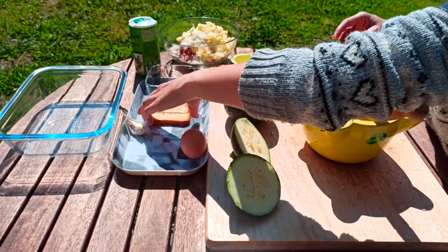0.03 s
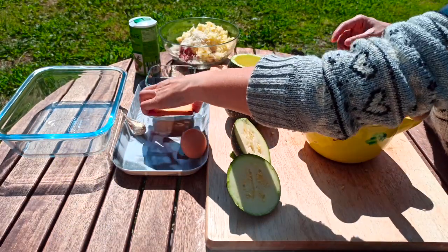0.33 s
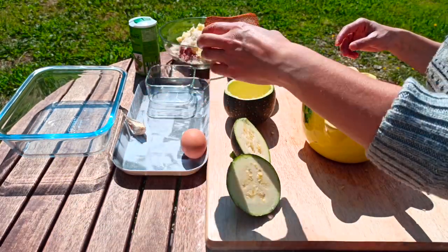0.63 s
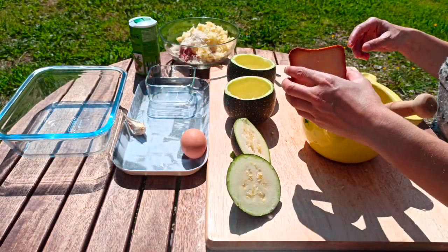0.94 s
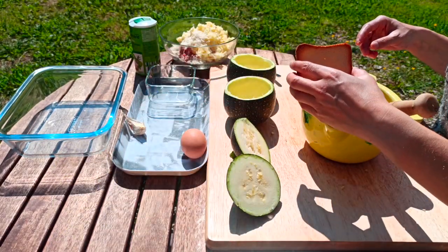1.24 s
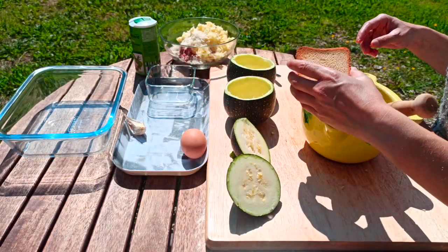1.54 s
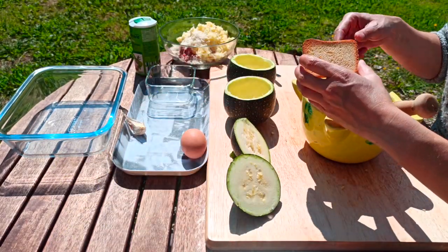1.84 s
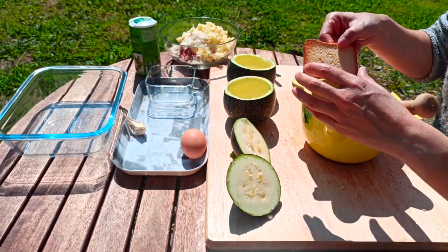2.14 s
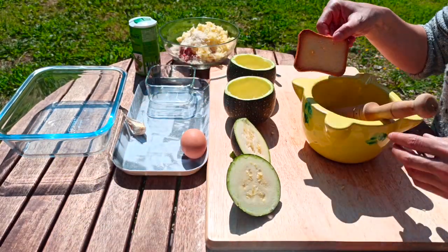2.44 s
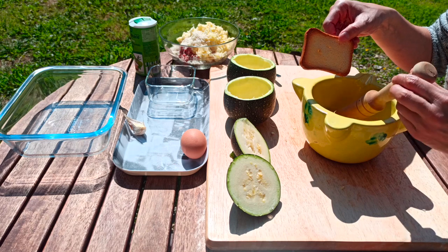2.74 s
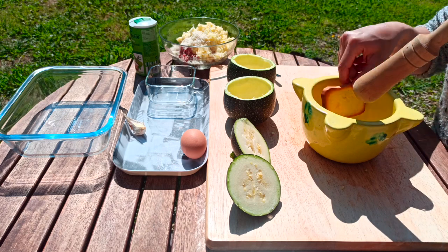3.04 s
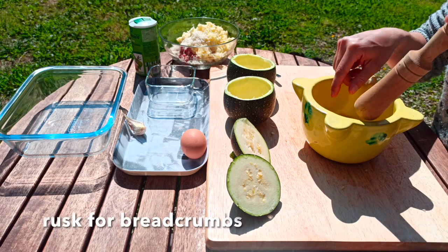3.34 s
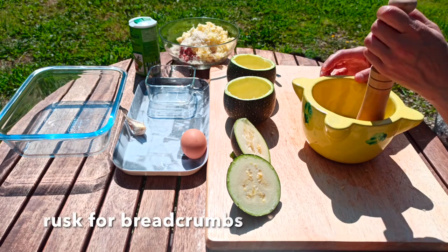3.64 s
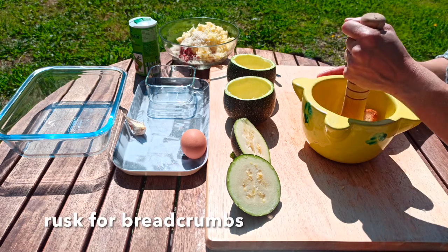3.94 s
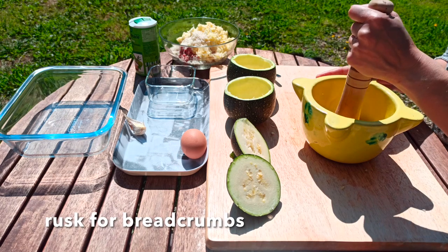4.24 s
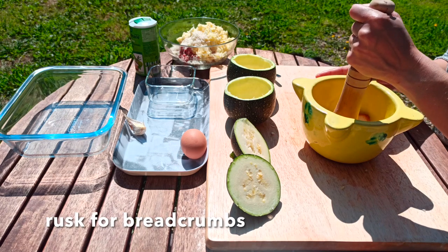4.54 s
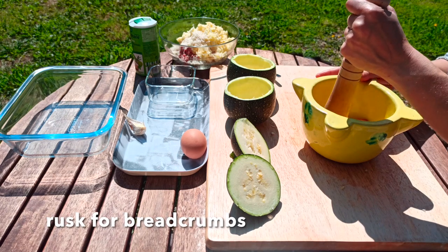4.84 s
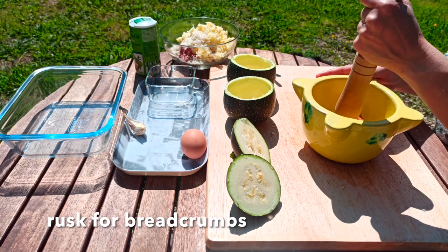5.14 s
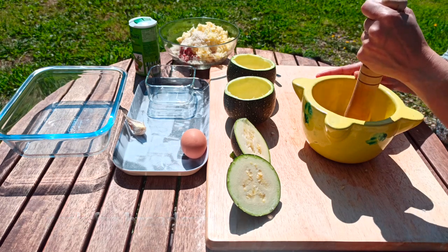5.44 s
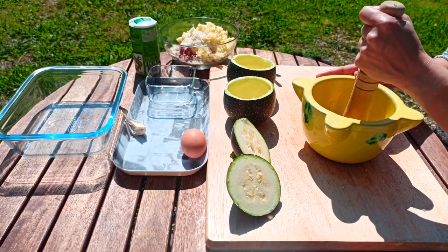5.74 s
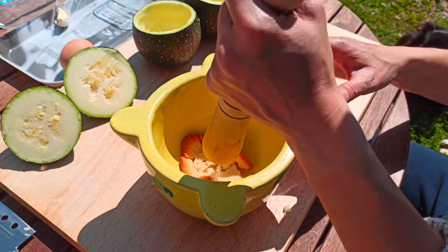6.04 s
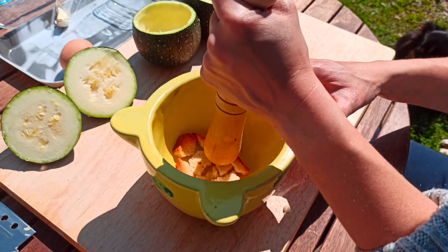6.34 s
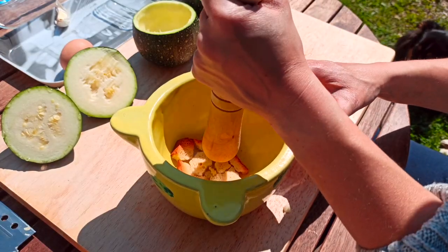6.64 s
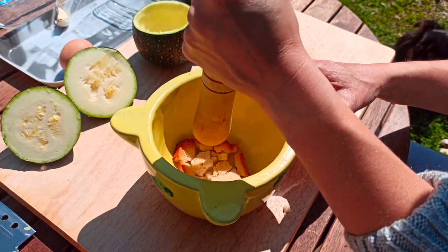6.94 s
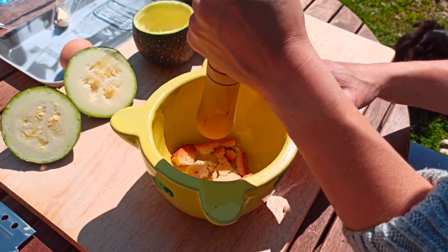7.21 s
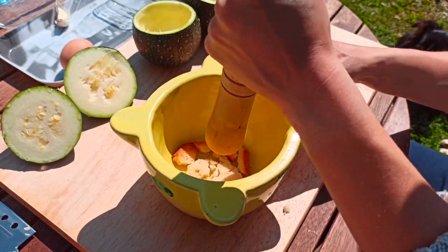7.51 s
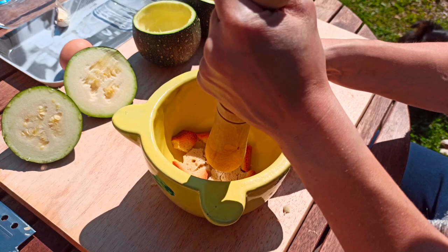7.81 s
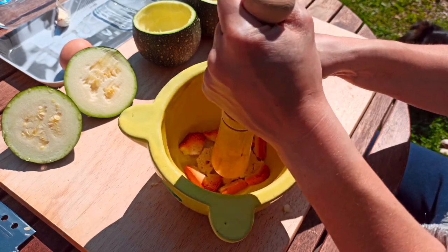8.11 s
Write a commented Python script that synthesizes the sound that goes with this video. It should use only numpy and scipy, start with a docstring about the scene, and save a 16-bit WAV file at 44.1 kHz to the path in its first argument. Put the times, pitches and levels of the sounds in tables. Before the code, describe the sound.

A wooden pestle pounds a brittle rusk in a ceramic mortar on an outdoor table, heard from close by. First come a soft knock, distant chirping birds and a faint brush of a sleeve, then a few snaps and hollow clinks. The pestle then settles into an even rhythm of sharp crunches and wooden thuds, with soft puffs of wind on the microphone in the later part.

```python
"""Pounding a rusk in the garden

A rusk is lifted off a tray, dropped in a ceramic mortar and pounded with a wooden pestle. Each blow is a
burst of tiny fractures over the thud of mortar, board and table. Songbirds and an insect sit far back.
We listen from a phone: first facing the table, then close over the mortar, where a breeze hits its ports."""
import sys
import numpy as np
from scipy import signal
from scipy.fft import rfft, irfft
from scipy.io import wavfile
from scipy.ndimage import uniform_filter1d

SR = 44100
rng = np.random.default_rng(int(sys.argv[2]) if len(sys.argv) > 2 else 0)


def transcribe(signal):
    """Save signal, clipped to [-1, 1], as a 16-bit WAV file at the path in sys.argv[1]."""
    frames = np.atleast_2d(signal).T
    limited = np.clip(frames, -1, 1)
    pcm = np.round(limited * 32767).astype(np.int16)
    wavfile.write(sys.argv[1], SR, pcm)


N = 364707
TIME = np.arange(N) / SR
MOVE_S = 5.98  # the perspective cuts from front to overhead

# tone of the garden bed: (frequency [Hz], gain [dB])
GARDEN_EQ = [(15, -59), (25, -24), (120, -1), (315, -7), (453, -7.5), (523, -9), (751, -13.5),
             (1550, -21.5), (1790, -21), (3280, -24), (4270, -22.5), (7260, -24), (8000, -25),
             (10400, -58.5), (17600, -120)]
# runs of down-slurred bird notes: (start [s], end [s], spacing [s], note length [s],
# first pitch [Hz], last pitch [Hz], fall per note [octaves], level [dB])
BIRD_RUNS = [(0.027, .75, .125, 0.083, 3530, 3440, 0.23, -66.5),
             (2.439, 2.87, 0.1, .055, 3454, 3306, 0.57, -56.5),
             (2.53, 2.75, 0.074, 0.0276, 5510, 5460, 0.075, -60.5),
             (6.001, 6.75, 0.15, 0.089, 4010, 2507, .2, -62.5),
             (6.92, 7.28, 0.13, 0.0904, 3530, 2800, 0.12, -66.5)]
# a warbler's syllable: (time into it [s], pitch [Hz], gain [dB])
WARBLER_SYLLABLE = [(0, 4480, -19), (0.041, 5300, -29), (.05, 6600, -2.5), (0.064, 6570, -22),
                    (0.081, 4570, 5), (0.108, 4250, -11), (.113, 3850, 5.5), (0.132, 4120, -16),
                    (.147, 3950, -23)]
# lone arched bird notes: (time [s], length [s], middle pitch [Hz], fall [octaves], level [dB])
BIRD_NOTES = [(0.294, 0.056, 3680, 0.8, -58), (2.939, 0.048, 2906, -0.53, -55),
              (3.069, 0.062, 3800, 0.48, -54), (3.152, 0.046, 3113, -.15, -54.5),
              (3.368, 0.067, 2976, .6, -57), (3.518, 0.1, 3150, .4, -57.5),
              (7.711, 0.063, 3840, .25, -53.5), (7.855, .036, 3690, .3, -55.5),
              (8.013, 0.046, 2660, -0.55, -59.5), (8.225, 0.037, 2870, 0.5, -62)]
# thin insect trills: (time [s], length [s], pitch [Hz], level [dB])
INSECT_TRILLS = [(0.628, 0.17, 7260, -73), (7.336, .28, 7430, -74)]
# light knocks on tray, board and mortar: (time [s], peak [dB], low-pass [Hz], table share [dB])
KNOCKS = [(.166, -39.5, 695, -11), (0.184, -41.5, 900, 5), (0.223, -28, 870, -8.5), (.271, -43.5, 1400, 2),
          (3.142, -39.5, 1170, 0.5), (3.227, -34, 1600, -5), (3.299, -31, 1200, 6), (3.312, -23, 1490, -4),
          (5.985, -40.5, 600, 11.5), (8.197, -32, 550, 15.5), (8.233, -34, 700, 1)]
# modes of the mortar on its board: (base frequency [Hz], level [dB], base t60 [s])
BOARD_MODES = [(336, 0, 0.095), (467, -11, 0.046), (602, -9.5, 0.14), (803, -3, 0.076), (959, -0.5, 0.057),
               (1410, -5.5, 0.039), (1710, -16.5, .06), (1750, -0.5, .06)]
# modes of the table beneath: (base frequency [Hz], level [dB], t60 [s])
TABLE_MODES = [(122.6, -14.5, 0.14), (161.5, -11, 0.086), (227.7, -5.5, 0.042)]
# tone of the chattering table slats: (frequency [Hz], gain [dB])
SLAT_EQ = [(60, -20.5), (150, 0.5), (220, -2), (310, 4), (430, -1.5), (650, -8), (1000, -5.5),
           (1500, -12.5), (5000, -32.5)]
# pieces of rusk snapping alone: (time [s], level [dB], treble tilt [dB/octave])
SNAPS = [(0.2244, -34, 0), (3.141, -34.5, 0.5), (3.229, -47.5, -1), (3.3011, -24.5, -2),
         (3.36, -29.5, -2.5), (3.946, -36.5, 0), (4.012, -45.5, -8.5), (4.047, -38.5, 0), (4.0627, -28, -1),
         (5.143, -46, -0.5), (5.333, -38.5, -2), (5.357, -43, 2.5), (5.6556, -43, 7.5), (6.144, -42, 0),
         (7.197, -37.5, 6), (7.630, -22, 1), (8.251, -43, 3)]
# the pestle cracks the rusk, breaks through and lands: (time [s], crack [dB], rise [ms], decay [ms],
# thud [dB], thud low-pass [Hz], landing delay [ms], landing crack [dB], landing thud [dB])
BLOWS = [(3.9046, -15.5, 0.98, 6.3, -21.5, 2200, 6.7, -35, -47),
         (4.160, -20.5, 1.84, 4.6, -27, 600, 14, -49.5, -39.5),
         (4.4338, -24.5, 1.23, 0.81, -22.5, 280, 7.7, -34, -27.5),
         (4.7036, -20.5, 1.43, 2.3, -30, 540, 11.4, -24, -36.5),
         (4.968, -17, 1.6, 1.5, -29, 1000, 9.2, -21.5, -23.5),
         (5.268, -21.5, 2.37, 1.4, -36.5, 1500, 15, -34, -48),
         (5.523, -25.5, 1.03, 9.8, -37.5, 352, 29.3, -28.5, -45.5),
         (6.3329, -15, 0.67, 1.3, -29.5, 1100, 7.3, -13, -27.5),
         (6.575, -16.5, 1.6, 3.2, -17.5, 348, 6, -31, -36.5),
         (6.813, -14, 0.97, 3.5, -22, 747, 30.3, -52, -27),
         (7.072, -15.5, 1.6, 3.6, -21, 325, 12, -17, -27.5),
         (7.3545, -18.5, 1.4, 1.4, -20.5, 420, 24, -56.5, -32),
         (7.643, -16.5, 1.08, 1.1, -26.5, 602, 7.9, -16.5, -32),
         (7.905, -17, 0.98, 0.75, -26, 390, 8, -36, -43),
         (8.155, -17, 1.6, 1.8, -28.5, 1100, 7.2, -17, -32)]
# a blow from each perspective: (tilt [dB/octave], pitch [x], table share [dB], ring time [x], chatter [s])
FRONT_BLOW = (0, .98, 2, 0.63, .033)
ABOVE_BLOW = (1.6, .91, 0, 1.07, .065)
# bowl resonances: (frequency [Hz], width [Hz], level against the direct crunch [dB])
BOWL_RESONANCES = [(3810, 58, -18.5), (6580, 230, -5.5), (7500, 990, -3.5)]
# tone of the crunch leaving the bowl, front and overhead: (frequency [Hz], gain [dB])
FRONT_CRUNCH_EQ = [(50, -41.5), (200, -16), (820, -11), (1250, -16), (1750, -2), (2400, -5.5), (3200, -2.5),
                   (4400, 0.5), (5400, -11), (6500, -1), (7600, -1.5), (8400, -8), (12000, -18.5),
                   (15500, -22.5)]
ABOVE_CRUNCH_EQ = [(50, -50), (400, 0), (850, -10), (1400, -12), (1800, -4.5), (2300, -11.5), (3000, -4),
                   (4100, -1.5), (5400, -8), (6600, 0), (7700, -7), (8400, -12), (12000, -16),
                   (15500, -20.5)]
# a knitted sleeve brushes past: (time [s], half length [s], level [dB])
BRUSHES = [(2.588, 0.021, -52), (2.663, 0.026, -51), (2.766, 0.024, -50.5)]
# tone of the wool: (frequency [Hz], gain [dB])
SLEEVE_EQ = [(400, -22), (1100, 1.5), (2500, 10), (4500, 4.5), (7500, 2.5), (9000, -15), (15000, -36)]
# the pestle touches the bare wall: (time [s], peak [dB])
CLINKS = [(3.312, -31), (3.5168, -23.5), (3.5737, -30.5)]
# modes of the ceramic wall: (frequency [Hz], level [dB], t60 [s])
WALL_MODES = [(358, -26.5, 0.097), (610, -18, 0.047), (828, -18, 0.038), (1383, -0.5, 0.085),
              (1760, -10.5, 0.098), (1774, -9, 0.044), (2820, -38, 0.041)]
# fader ride of the breeze: (time [s], level [dB])
BREEZE_RIDE = [(5.98, -68), (6.0, -54), (6.64, -45.5), (6.74, -63), (6.81, -46.5), (6.99, -61.5),
               (7.08, -51), (7.16, -65), (7.41, -43.5), (7.43, -58), (8.1, -56.5), (8.27, -46.5)]
# single puffs thump the ports: (time [s], level [dB])
PUFFS = [(6.026, -37.5), (6.3, -45), (6.469, -34), (6.505, -43.5), (6.643, -45), (6.755, -36),
         (7.307, -41.5)]
# tone of wind on the ports: (frequency [Hz], gain [dB])
BUFFET_EQ = [(25, -7), (50, -63), (70, 7), (115, 7), (190, -6), (300, -27), (600, -31), (1500, -52),
             (5000, -104)]
# stereo balance, front and overhead: (frequency [Hz], left minus right [dB])
FRONT_PAN = [(400, -1.5), (3000, -1), (5500, -1.5), (6400, 5), (7700, 3), (8600, -9), (12000, -7),
             (13200, -7), (15500, -8)]
ABOVE_PAN = [(400, -0.5), (1500, 2), (2500, 5), (4300, 8.5), (5800, 3.5), (6800, 4), (7750, 11.5),
             (8300, -13), (12000, 0.5), (15500, 5)]
# the phone's deeply scooped treble: (frequency [Hz], gain [dB])
PHONE_EQ = [(8400, 2.5), (8800, -10), (9900, -18), (11200, -16.5), (11700, 7), (15600, 9), (16200, -32.5)]


def undb(db):
    """Decibels to gain."""
    return 10 ** (np.asarray(db) / 20)


def unit(x):
    """Scale to rms 1."""
    return x / np.sqrt(np.mean(x ** 2))


def add(track, s, sound):
    """Mix a sound into a track from time s on."""
    i = max(int(s * SR), 0)
    part = sound[:max(N - i, 0)]
    track[i:i + len(part)] += part


def butter(x, hz, kind, order=2):
    """Plain low- or high-pass."""
    return signal.sosfilt(signal.butter(order, hz, kind, fs=SR, output="sos"), x)


def colour(x, points, size=8192):
    """Minimum-phase EQ through (frequency [Hz], gain [dB]) points."""
    hz, db = np.transpose(points)
    bins_hz = np.maximum(np.arange(size // 2 + 1) * SR / size, 1)
    cepstrum = irfft(np.log(undb(np.interp(np.log(bins_hz), np.log(hz), db))))
    cepstrum[1:size // 2] *= 2
    cepstrum[size // 2 + 1:] = 0
    return signal.fftconvolve(x, irfft(np.exp(rfft(cepstrum))))[:N]


def shaped(x, points):
    """EQ a white sound without changing its power."""
    return colour(x, points) / np.linalg.norm(colour(np.ones(1), points))


def drift(rate_hz):
    """Smooth random modulation, rms 1."""
    hold = int(SR / rate_hz)
    steps = np.repeat(rng.standard_normal(N // hold + 1), hold)
    return unit(uniform_filter1d(steps, hold)[:N])


def reverb(x, t60):
    """Diffuse reflections that die away in t60 seconds."""
    t = TIME[:SR]
    tail = rng.standard_normal(SR) * undb(-60 * t / t60) * (1 - np.exp(-t / .004))
    return signal.fftconvolve(x, tail / np.linalg.norm(tail))[:N]


def garden_bed(hush_db=-66, hiss_db=-76):
    """A wide, gently breathing outdoor hush, with separate hiss at each port."""
    level = undb(hush_db + .7 * drift(3))
    mid, side = (shaped(rng.standard_normal(N), GARDEN_EQ) * level for _ in range(2))
    side = colour(side, [(60, 0.5), (200, -5.5), (600, -1), (1500, 0.5)])
    hiss = undb(hiss_db) * rng.standard_normal((2, N))
    return np.array([mid + side, mid - side]) + hiss


def whistle(hz):
    """A pure tone on a moving pitch, rms 1."""
    return np.sqrt(2) * np.sin(2 * np.pi * np.cumsum(hz) / SR)


def bird_note(length, hz, fall, arch=.11, quaver=.022):
    """One quavering whistle; fall and arch bend its pitch, in octaves."""
    u = np.linspace(-1, 1, int(length * SR))
    waver = 1 + quaver * np.interp(TIME[:len(u)], np.arange(64) / 140, rng.standard_normal(64))
    return np.sqrt(1 - u ** 2) * whistle(hz * waver * 2 ** (-fall * u / 2 - arch * u ** 2))


def songbirds(chirp_count=45, chirp_db=-72, chirp_hz=3590):
    """Whistled runs and lone notes, with farther birds chirping at random."""
    out = np.zeros(N)
    for start, end, period, length, first_hz, last_hz, fall, db in BIRD_RUNS:
        times = np.arange(start, end, period)
        for s, hz in zip(times, np.geomspace(first_hz, last_hz, len(times))):
            detune = 2 ** (.03 * rng.standard_normal())
            add(out, s, undb(db) * bird_note(length, hz * detune, fall, arch=0))
    for when, (high, fall) in zip(rng.random(chirp_count), rng.standard_normal((chirp_count, 2))):
        chirp = bird_note(length=0.082, hz=chirp_hz * 2 ** (.25 * high), fall=0.29 * fall)
        add(out, when * N / SR, undb(chirp_db) * chirp)
    for s, length, hz, fall, db in BIRD_NOTES:
        add(out, s, undb(db) * bird_note(length, hz, fall))
    return out


def warbler(start_s=1.447, end_s=2.35, period_s=.163, full_db=-55.5, full_s=2.025, swell_db_per_s=35):
    """One whistled syllable, repeated evenly and swelling to full voice."""
    out = np.zeros(N)
    at, hz, db = np.transpose(WARBLER_SYLLABLE)
    t = TIME[:int(at[-1] * SR)]
    for s in np.arange(start_s, end_s, period_s):
        song_db = full_db - swell_db_per_s * max(full_s - s, 0)
        pitch = np.interp(t, at, hz) * (1 + 0.0089 * rng.standard_normal())
        add(out, s, whistle(pitch) * undb(song_db + np.interp(t, at, db)))
    return out


def far_off(x, direct_db=-5, echo_db=-1.5, echo_s=0.63):
    """Distance: moving air flutters the level and the trees smear it."""
    fluttered = x * undb(3 * drift(70) - 1)
    echoes = np.array([reverb(fluttered, echo_s) for _ in range(2)])
    return undb(direct_db) * fluttered + undb(echo_db) * echoes


def ring(modes, pitch, spread_db, length=1):
    """Struck modes of alternating sign; each point of contact weights them a little differently."""
    hz, db, t60 = np.transpose(modes)[:, :, None]
    t = TIME[:SR // 3]
    weight, detune = rng.standard_normal((2, len(modes), 1))
    sign = (-1) ** np.arange(len(modes))[:, None]
    fade = np.exp(-np.log(1000) * t / (t60 * length))
    partials = np.sin(2 * np.pi * hz * pitch * (1 + 0.01013 * detune) * t)
    return np.sum(sign * undb(db + spread_db * weight) * fade * partials, axis=0)


def thud(db, lowpass_hz, pitch, table_db, length, chatter_s, chatter_db=-11):
    """A hit rings the board and shakes the table, whose slats chatter."""
    board = ring(BOARD_MODES, pitch, spread_db=3.5, length=length)
    size = len(board)
    chatter = unit(colour(rng.standard_normal(size), SLAT_EQ)[:size]) * np.exp(-TIME[:size] / chatter_s)
    table = ring(TABLE_MODES, pitch=0.95, spread_db=3.0) + undb(chatter_db) * chatter
    body = butter(board + undb(table_db) * table, lowpass_hz, "low")  # crumbs cushion the push
    body = butter(body, 90, "high", order=3)  # a small open table radiates no deep bass
    return undb(db) * body / np.abs(body).max()


def knocks(lead_s=.001, landing_hz=750, shake_db=4):
    """The weight layer: light knocks, and two thuds a blow, the landing shaking the table more."""
    out = np.zeros(N)
    for s, _, _, _, db, lowpass_hz, landing_ms, _, landing_db in BLOWS:
        _, pitch, table_db, length, chatter_s = perspective(s)
        strike = thud(db, lowpass_hz, pitch, table_db - shake_db, length, chatter_s)
        landing = thud(landing_db, landing_hz, pitch, table_db + shake_db, length, chatter_s)
        add(out, s - lead_s, strike)
        add(out, s - lead_s + landing_ms / 1000, landing)
    for s, db, lowpass_hz, table_db in KNOCKS:
        add(out, s, thud(db, lowpass_hz, pitch=0.999, table_db=table_db, length=0.69, chatter_s=0.052))
    return out


def perspective(s):
    """The voicing of a blow at time s, from where the phone stands."""
    return ABOVE_BLOW if s > MOVE_S else FRONT_BLOW


def fractures(size, per_s, spread_db):
    """A crackle of tiny snaps of unequal strength, rms 1."""
    strength = undb(spread_db * np.minimum(rng.exponential(size=size), 4))
    return unit(strength * rng.standard_normal(size) * (rng.random(size) < per_s / SR))


def crunch(peak_s, db, rise_ms, decay_ms, tilt_db, patchy_db=1.13, trickle_db=-27, settle_db=-39):
    """Cracks avalanche to a peak; fine crumbs trickle after them and larger ones settle late."""
    t = TIME[:SR // 4] - peak_s
    age = np.abs(t)
    bins_hz = np.arange(len(t) // 2 + 1) * SR / len(t)
    octave = np.log2(np.clip(bins_hz, 600, 16000) / 6000)
    # each piece gets its own random EQ
    patches = np.interp(octave, np.linspace(octave[0], octave[-1], 20), rng.standard_normal(20))
    attack = np.exp(-age * 1000 / rise_ms)
    release = np.exp(-(age * 1000 / decay_ms) ** 0.6 / 0.64)
    swell = np.where(t < 0, attack, release)
    avalanche = swell * fractures(len(t), per_s=30000, spread_db=1)
    avalanche *= np.linalg.norm(swell) / np.linalg.norm(avalanche)
    trickle = undb(trickle_db) * np.exp(-age / 0.022) * fractures(len(t), per_s=990, spread_db=2)
    settle = undb(settle_db) * np.exp(-age / 0.026) * fractures(len(t), per_s=250, spread_db=3.5)
    burst = avalanche + (t > 0) * (trickle + settle)
    return undb(db) * irfft(rfft(burst) * undb(tilt_db * octave + patchy_db * patches), len(t))


def rusk(snap_rise_ms=0.93, snap_decay_ms=0.75, landing_decay_ms=2.3, crumbs=6, crumb_db=-55):
    """The brittle layer: lone snaps, then two crunches and a few falling crumbs for each blow."""
    out = np.zeros(N)
    cracks = [(s, db, snap_rise_ms, snap_decay_ms, tilt_db) for s, db, tilt_db in SNAPS]
    for s, db, rise_ms, decay_ms, _, _, landing_ms, landing_db, _ in BLOWS:
        tilt_db = perspective(s)[0]
        cracks.append((s, db, rise_ms, decay_ms, tilt_db))
        cracks.append((s + landing_ms / 1000, landing_db, snap_rise_ms, landing_decay_ms, tilt_db))
        for late, size in zip(rng.random(crumbs), rng.standard_normal(crumbs)):
            falls_s = s + .025 + .145 * late ** 2  # most crumbs drop back early
            cracks.append((falls_s, crumb_db + 4 * size, snap_rise_ms, snap_decay_ms, tilt_db))
    preroll_s = .02  # puts each peak on its cue
    for s, *crack in cracks:
        add(out, s - preroll_s, crunch(preroll_s, *crack))
    return out


def bowl(x):
    """The ceramic adds its bright resonances to the crunch."""
    return x + sum(undb(db) * signal.lfilter(*signal.iirpeak(hz, hz / width, fs=SR), x)
                   for hz, width, db in BOWL_RESONANCES)


def insect():
    """A thin, high tone with a jittery pitch, fading in and out."""
    out = np.zeros(N)
    for s, length, hz, db in INSECT_TRILLS:
        swell = np.sin(np.linspace(0, np.pi, int(length * SR)))
        jitter = 1 + 0.004 * drift(221)[:len(swell)]
        add(out, s, undb(db) * swell * whistle(hz * jitter))
    return out


def sleeve():
    """Soft swishes of wool fibres."""
    swell = sum(undb(db) * np.exp(-((TIME - s) / half) ** 2) for s, half, db in BRUSHES)
    return shaped(swell * fractures(N, per_s=15000, spread_db=1), SLEEVE_EQ)


def clinks():
    """Wood on bare ceramic: a short hollow ring."""
    out = np.zeros(N)
    for s, db in CLINKS:
        body = butter(ring(WALL_MODES, pitch=1, spread_db=1.5), 160, "high")
        add(out, s, undb(db) * body / np.abs(body).max())
    return out


def breeze(trim_db=1, eddy_db=4, puff_s=0.0071):
    """Quick eddies and puffs rumble on each port separately, harder on the right."""
    ride_db = np.interp(TIME, *np.transpose(BREEZE_RIDE)) + trim_db
    eddies = undb(ride_db + eddy_db * np.tanh(drift(35))) * (TIME > MOVE_S)
    puffs = sum(undb(db) * np.exp(-((TIME - s) / puff_s) ** 2) for s, db in PUFFS)
    return np.array([shaped((eddies + puffs) * rng.standard_normal(N), BUFFET_EQ) * undb(port_db)
                     for port_db in (0, 3)])


def ports(x, pan, lag_samples, yard_db=-26, yard_s=0.39, dishes_db=-12, dishes_s=0.0088):
    """Two mic ports, offset in time; each has its own colour and echoes from dishes and yard."""
    hz, db = np.transpose(pan)
    left = np.roll(colour(x, np.c_[hz, db / 2]), lag_samples)
    right = colour(x, np.c_[hz, -db / 2])
    dish_eq = [(300, -21), (1500, 10)]  # dishes are too small to reflect the bass
    return np.array([port + undb(dishes_db) * reverb(colour(port, dish_eq), dishes_s)
                     + undb(yard_db) * reverb(port, yard_s) for port in (left, right)])


def scene():
    """The table from the front, then from overhead, set in the garden."""
    brittle = bowl(rusk())
    foley = knocks() + clinks() + sleeve()
    close = TIME > MOVE_S
    front = shaped(brittle * ~close, FRONT_CRUNCH_EQ) + foley * ~close
    above = shaped(brittle * close, ABOVE_CRUNCH_EQ) + foley * close
    table = ports(front, FRONT_PAN, lag_samples=6) + ports(above, ABOVE_PAN, lag_samples=-5)
    wildlife = far_off(warbler() + songbirds() + insect())
    return table + wildlife + garden_bed() + breeze()


def record(dry, top_hz=16900):
    """The phone colours the treble and cuts the top."""
    coloured = np.array([colour(channel, PHONE_EQ) for channel in dry])
    return signal.sosfilt(signal.ellip(8, .2, 70, top_hz, fs=SR, output="sos"), coloured)


dry = scene()
out = record(dry)
transcribe(out)
```